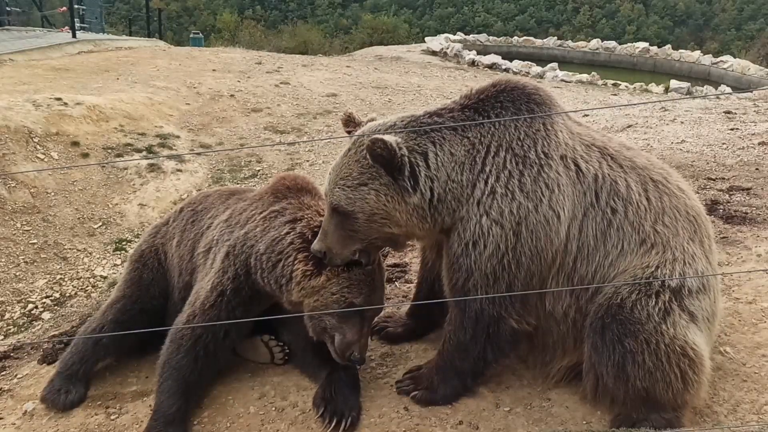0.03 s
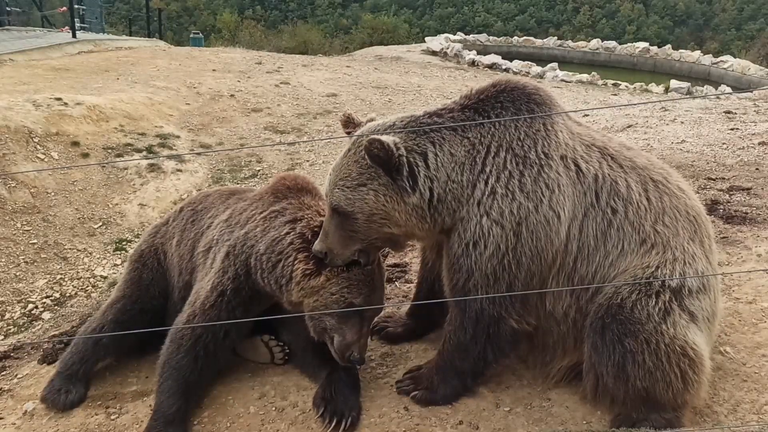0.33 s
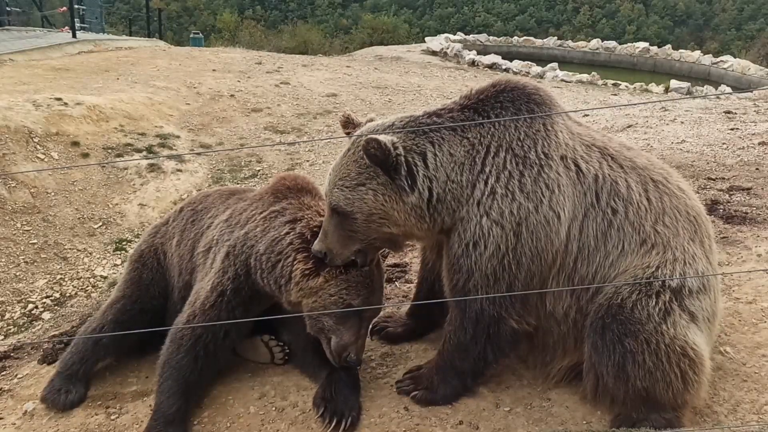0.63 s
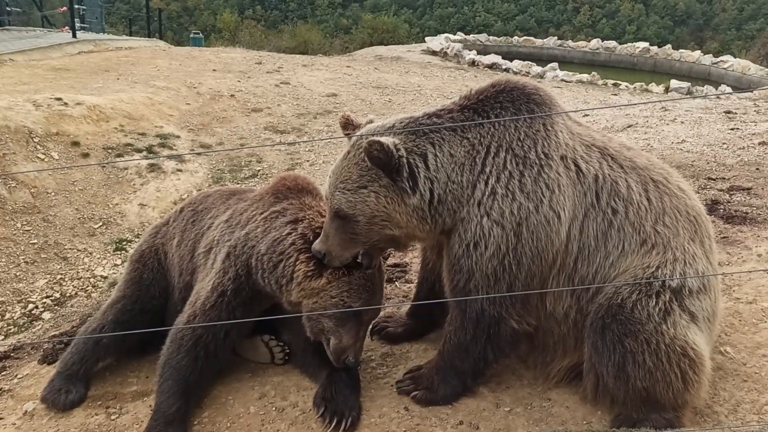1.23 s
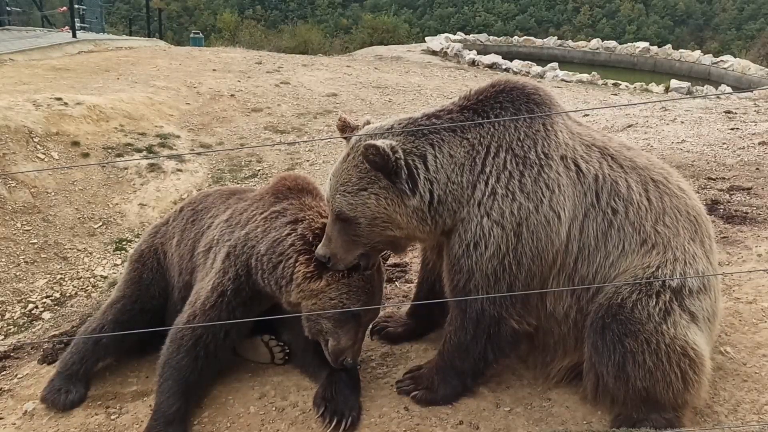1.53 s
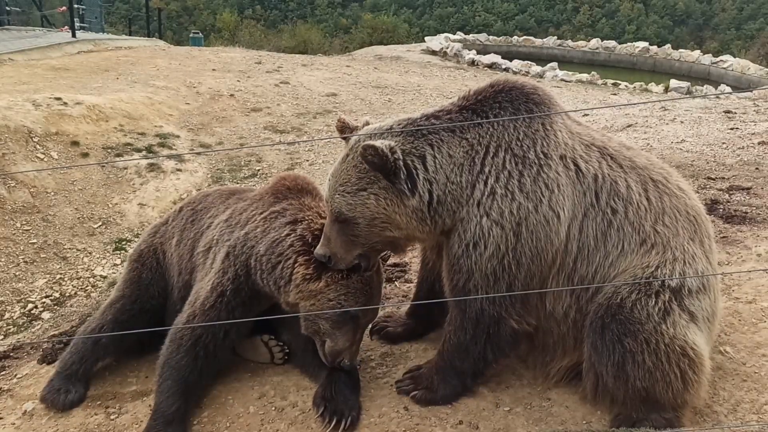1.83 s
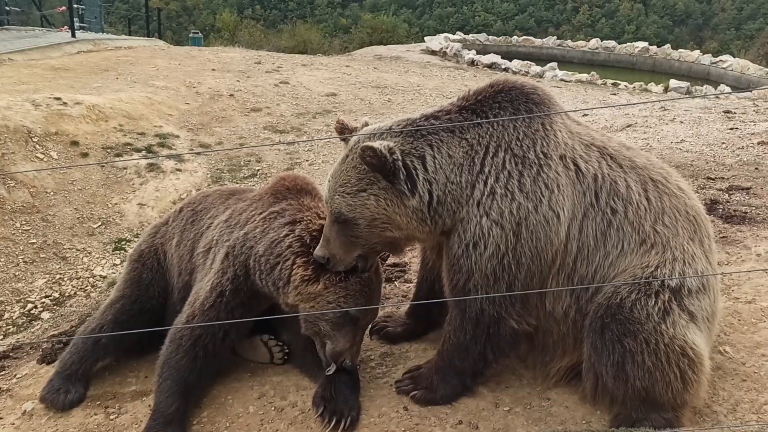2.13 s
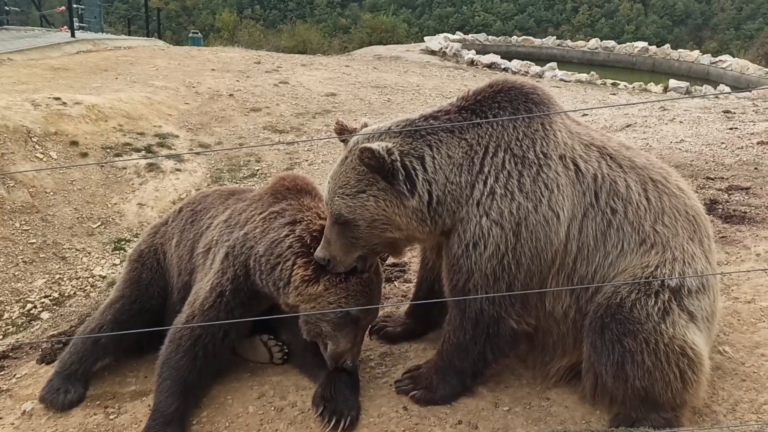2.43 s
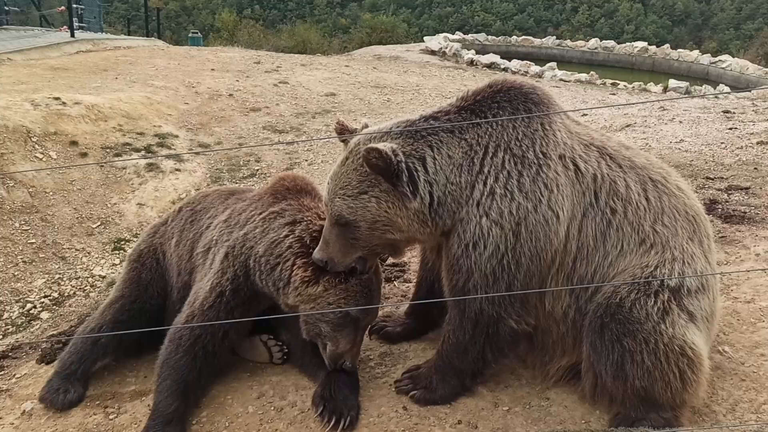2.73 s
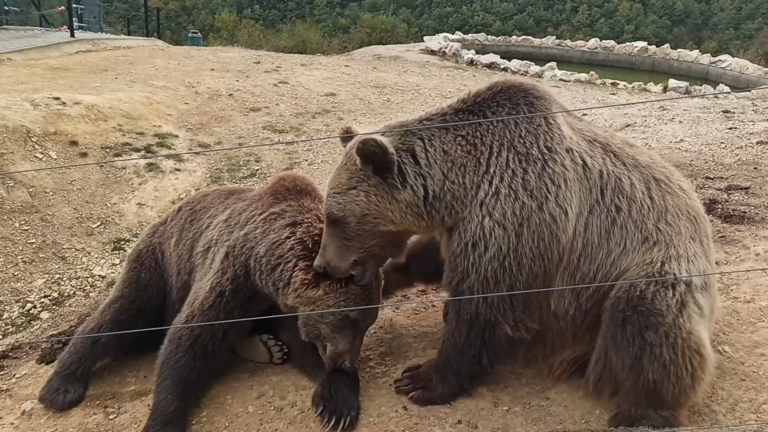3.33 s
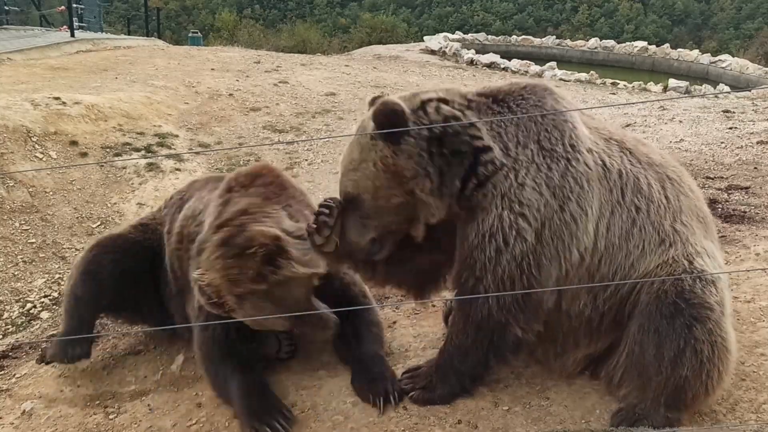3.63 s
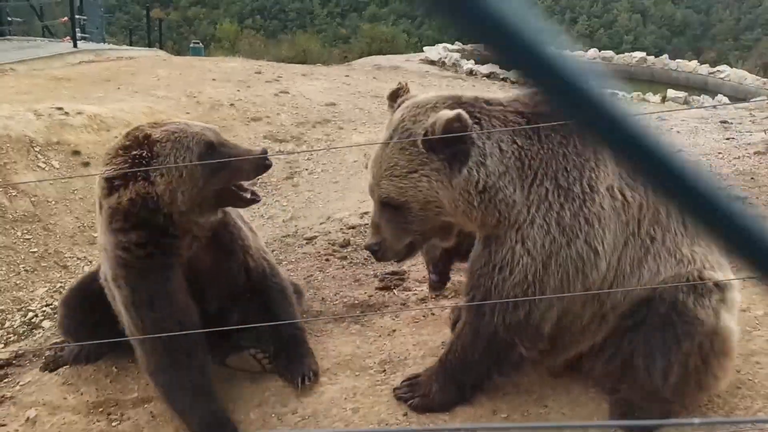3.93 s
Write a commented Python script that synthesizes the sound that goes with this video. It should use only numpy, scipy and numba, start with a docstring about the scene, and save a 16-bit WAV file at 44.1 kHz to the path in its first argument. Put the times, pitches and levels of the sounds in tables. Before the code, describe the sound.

A bear's low, pulsing purr runs steadily over a faint open-air hiss. It grows louder, and after a short scuffle of paws it gives way to a loud, breathy roar with one brief squeal in it.

```python
"""Bear purring, then roaring

A brown bear nuzzles another in an open enclosure and purrs in short throbbing bursts: slow slaps of
the vocal folds excite chest and throat. The purr swells, paws scuff the dirt, and a loud hoarse roar
breaks out, uneven pulses and breath filtered by the opening mouth. It cracks once into a squeal.
A faint outdoor hiss lies underneath."""
import sys
import numpy as np
from scipy import signal
from scipy.fft import rfft, irfft
from scipy.io import wavfile
from scipy.ndimage import uniform_filter1d
from numba import njit

SR = 44100
rng = np.random.default_rng(int(sys.argv[2]) if len(sys.argv) > 2 else 0)


def transcribe(u):
    """Save the signal u as a 16-bit wav file named by the first command-line argument.

    u: samples, shape (n,) or (channels, n), limited to [-1, 1]; the rate is SR.
    q: integer samples, one column per channel.
    """
    v = np.clip(np.atleast_2d(u).T, -1, 1)
    q = np.round(v * 32767).astype(np.int16)
    wavfile.write(sys.argv[1], SR, q)


N = 176400
T = np.arange(N) / SR


def from_db(db):
    """Amplitude ratio of a level in decibels."""
    return 10 ** (np.asarray(db) / 20)


def rms_one(x):
    """Normalisation to unit mean power."""
    return x / np.sqrt(np.mean(x ** 2) + 1e-20)


def even(x):
    """Division by the running RMS holds the power near one."""
    return x / np.sqrt(np.abs(uniform_filter1d(x * x, size=700)) + 1e-12)


def in_time(rows):
    """Linear interpolation in time, one curve per column after the first."""
    times, *columns = np.transpose(rows)
    return [np.interp(T, times, column) for column in columns]


def onset(rows):
    """A 5 ms ramp from silence, complete at the time of the first row."""
    return np.clip((T - rows[0][0]) * 200 + 1, 0, 1)


def at_hz(points, hz):
    """Interpolation on a logarithmic frequency axis."""
    freqs, values = np.transpose(points)
    return np.interp(np.log(hz + 1), np.log(freqs), values)


def colour(x, spectrum):
    """Minimum-phase filter: folding the cepstrum makes the given spectrum causal."""
    n = 2 * N
    cepstrum = irfft(np.log(from_db(at_hz(spectrum, np.arange(N + 1) * SR / n))))
    cepstrum[1:N] *= 2
    cepstrum[N + 1:] = 0
    return irfft(rfft(x, n) * np.exp(rfft(cepstrum)))[..., :N]


def drift(rate_hz):
    """Random modulation: low-passed noise of unit power."""
    lowpass = signal.butter(2, rate_hz, fs=SR, output="sos")
    return rms_one(signal.sosfilt(lowpass, rng.standard_normal(N)))


def stereo_noise(spectrum):
    """Partly coherent noise: the ears agree in the bass and less in the treble."""
    # interaural coherence: f/Hz, coherence (0-1)
    coherence = [(100,.99),(500,.97),(1000,.85),(2000,.5),(4500,.4),(8000,.55),(14000,.66)]
    alike = np.clip(at_hz(coherence, np.arange(N // 2 + 1) * SR / N), 0, 1)
    mid, side = rfft(rng.standard_normal((2, N)))
    ears = irfft(mid * np.sqrt(1 + alike) + side * np.sqrt(1 - alike) * [[1], [-1]])
    return rms_one(colour(ears, spectrum))


@njit
def resonate(x, hz, width_hz):
    """Two-pole resonator with a moving centre frequency."""
    y, r = np.zeros(len(x)), np.exp(-np.pi * width_hz / SR)
    for i in range(2, len(x)):
        drive = (1 - r * r) / 2 * (x[i] - x[i - 2])
        y[i] = drive + 2 * r * np.cos(2 * np.pi * hz[i] / SR) * y[i - 1] - r * r * y[i - 2]
    return y


def envelope(age, length, attack_s, release_s):
    """Linear rise, hold and exponential decay."""
    return np.clip(age / attack_s, 0, 1) * np.exp(-np.maximum(age - length, 0) / release_s)


def purr_bursts(bursts, hz, throat_db, rasp_db, attack_s):
    """Source and filter: fold slaps on a sagging pitch and breath ring the throat over a chest tone."""
    # response of the throat to the slaps, mouth shut: f/Hz, relative level/dB
    throat_response = [(90,-49),(135,12),(175,1),(270,-1),(365,-3.5),(440,-26.5),(500,-22),(570,-0.5),(680,-39.5),(900,-16),(1150,-27.5),(1290,-24.5),(1360,-11.5),(1450,-59),(2400,-39.5),(5000,-62)]
    # its response to breath noise: f/Hz, relative level/dB
    rasp_response = [(60,-33),(150,-19.5),(330,5.5),(450,-5),(570,15.5),(700,-4.5),(900,3.5),(1250,-11),(1350,7),(1480,-23),(2000,-12.5),(2550,-37),(3100,-12.5),(3500,-30),(4200,-31),(9000,-50)]
    sag_hz_per_s, jitter_s = 55, 0.00027
    chest_pull_hz = 5.8   # the chest rings a little above the folds' rate
    chest, slaps, airflow = np.zeros((3, N + SR))
    age = np.arange(SR // 5) / SR
    for start, length, db in bursts:
        span = slice(int(start * SR), int(start * SR) + len(age))
        cycles = (hz + rng.normal(0, 1.5)) * age - sag_hz_per_s * age ** 2 / 2
        # the chest tone sinks halfway through a long burst
        dip_db = (length > .08) * 6 * np.exp(-((age - length * 0.51) / 0.019) ** 2)
        tone = np.cos(2 * np.pi * (cycles + chest_pull_hz * (age - length / 2) - .12))
        chest[span] -= from_db(db - dip_db) * envelope(age, length - .004, attack_s, 0.015) * tone
        effort = from_db(db + throat_db) * envelope(age + 0.0074, length, 0.0092, 0.0096)
        closures = np.flatnonzero(np.diff(np.floor(cycles), prepend=-1))
        jitter, shimmer = rng.standard_normal((2, 32))[:, :len(closures)]
        slap_at = span.start + closures + (jitter * jitter_s * SR).astype(int)
        slaps[slap_at] += effort[closures] * from_db(2 * shimmer)
        airflow[span] += effort * (0.29 + 1.23 * np.exp(-(cycles % 1) / 0.17))
    ring = colour(slaps[:N], throat_response)
    ring *= np.sqrt(np.sum(slaps ** 2) / np.sum(ring ** 2) * SR / hz)
    rasp = colour(airflow[:N] * rng.standard_normal(N), rasp_response)
    rasp *= np.sqrt(np.sum(airflow ** 2) / np.sum(rasp ** 2))
    return from_db(-21.5) * chest[:N] - from_db(-32) * ring + from_db(rasp_db) * rasp


def purr():
    """Intermittent phonation: a run of soft bursts, then two forced ones, higher and louder."""
    # soft bursts: t/s, duration/s, relative level/dB
    bursts = [(0,.014,2),(.045,0.097,2),(.187,0.087,3.5),(.335,0.099,1),(.463,0.046,-0.5),(.527,0.057,1.5),(.603,0.043,-1),(.68,0.048,2.5),(.743,0.039,0),
              (.833,0.09,2.5),(.974,0.1,1.5),(1.113,0.026,-1),(1.182,0.1,1.5),(1.338,0.088,2),(1.474,0.098,1.5),(1.617,0.031,-1),(1.675,0.051,0.5),
              (1.748,.041,-0.5),(1.834,0.097,0.5),(1.98,0.1,0.5),(2.117,0.032,-1),(2.187,0.046,0.5),(2.251,0.036,-1),(2.347,0.0816,1.5),(2.486,.099,-0.5),
              (2.622,0.033,-1.5),(2.702,0.027,1),(2.76,0.037,0),(2.847,0.027,0.5),(2.903,.047,-0.5),(2.995,0.047,1.5),(3.058,0.049,1),(3.123,0.043,-1),(3.203,0.057,1.5)]
    # forced bursts: t/s, duration/s, relative level/dB
    swells = [(3.262,0.054,8.5),(3.323,0.052,9.5)]
    soft = purr_bursts(bursts, hz=91.84, throat_db=-1.96, rasp_db=-38, attack_s=0.017)
    forced = purr_bursts(swells, hz=100.2, throat_db=-2.5, rasp_db=-34, attack_s=0.014)
    return signal.sosfilt(signal.butter(3, 75, "high", fs=SR, output="sos"), soft + forced)


def outdoor_air():
    """Ambient noise: a faint, stationary broadband hiss."""
    # faint outdoor hiss, with a 9-11 kHz band filtered out: f/Hz, relative level/dB
    spectrum = [(25,-12),(60,-10),(150,15.5),(500,6.5),(900,4),(1500,-1.5),(2500,-9),(3100,-7),(4400,-7),(5300,-15.5),(5900,-15.5),(6500,-7.5),(7500,-6.5),(8400,-15.5),(8900,-24),(11300,-24),(11800,-14),(13500,-10),(15500,-12)]
    return from_db(-46) * stereo_noise(spectrum)


def scuffs():
    """Friction noise: paws, fur and muzzle rub in short band-limited puffs."""
    # rubbing contacts: t/s, duration/s, level/dB, band frequency f/Hz
    contacts = [(0.094,.005,-59,7200),(2.423,0.026,-54.5,4600),(2.867,0.0065,-43,3900),(3.35,0.035,-48,2210),(3.383,.005,-30,936),(3.459,0.022,-36,1330),(3.49,0.028,-35.5,940)]
    puffs = np.zeros(N)
    for start, length, db, hz in contacts:
        band = signal.butter(2, [hz * 0.65, hz * 1.17], "band", fs=SR, output="sos")
        grit = rms_one(signal.sosfilt(band, rng.standard_normal(N)))
        puffs += from_db(db) * grit * envelope(T - start, length, attack_s=0.0023, release_s=0.0041)
    return puffs


def roar():
    """Formant filtering of uneven pulses and breath over chest tone and rumble; gives sound, airflow."""
    # phonation: t/s, pitch f/Hz, chest tone level/dB, roughness (0-1)
    phonation = [(3.49,114.9,-32,0.45),(3.525,117.7,-33.5,0.46),(3.546,118.7,-14.5,0.3),(3.575,127,-15.5,.15),(3.605,131.9,-14,0.19),(3.645,136.1,-14.5,0.35),(3.68,133.6,-16,0.4),(3.715,129.6,-19,0.24),(3.74,121,-9.5,.35),(3.765,128,-20.5,.45),
                 (3.793,146.7,-14.5,.2),(3.822,138.4,-29,0.35),(3.845,126.9,-15,0.37),(3.875,115.2,-17,0.41),(3.92,112.2,-14.5,0.48),(3.96,116,-16,0.55),(4.0,123.6,-13,.7)]
    # first formant as the mouth opens: t/s, f/Hz, level/dB
    mouth = [(3.49,300,-58),(3.515,305,-30),(3.532,320,-12),(3.55,350,-15),(3.565,352,-10),(3.6,382,-11.5),(3.654,372,-10),(3.684,366,-20.5),(3.712,447,-14.5),
             (3.73,515,-27),(3.743,473.4,-11),(3.774,472,-17.5),(3.82,517,-21),(3.85,520,-12.5),(3.89,560,-13),(3.95,537.8,-13.5),(4.0,489.8,-11.5)]
    # upper formants: t/s, second f/Hz, level/dB, third f/Hz, level/dB
    upper_formants = [(3.48,950,-69,1400,-51),(3.51,920,-34,1400,-54),(3.535,795,-48,1500,-48),(3.56,790,-36,1600,-29.5),(3.61,770,-33,1440,-29.5),(3.655,860,-37,1574,-20.5),(3.7,840,-14.5,1570,-27),
                      (3.73,775,-38,1320,-32.5),(3.745,860,-15.5,1240,-22),(3.77,800,-25.5,1420,-33.5),(3.805,720,-19.5,1510,-21.5),(3.85,780,-25.5,1240,-24),(3.89,890.6,-21,1250,-26.5),(3.94,880,-16,1230,-21.5),(4.0,878.6,-20.5,1240,-20.5)]
    # rumble between the lowest harmonics: f/Hz, relative level/dB
    rumble_spectrum = [(25,-23),(55,-24),(110,-7.5),(170,-8.5),(220,-4),(320,-1.5),(460,-3.5),(800,-21.5),(3000,-78)]
    hz, chest_db, rough = in_time(phonation)
    first_hz, first_db = in_time(mouth)
    second_hz, second_db, third_hz, third_db = in_time(upper_formants)
    jitter, shimmer_db, scatter_s = .025, 9.5, 0.0064   # jitter and shimmer at full roughness
    cycles = np.cumsum(hz * (1 + jitter * rough * drift(70))) / SR
    closures = np.diff(np.floor(cycles), prepend=0)
    pulses = rms_one(closures * from_db(shimmer_db * rough * drift(72)))
    age = T[:SR // 30]
    smear = rng.standard_normal(len(age)) * np.exp(-age / scatter_s)
    scattered = rms_one(signal.fftconvolve(pulses, smear)[:N])
    airflow = rms_one(2.4 + np.exp(-(cycles % 1) / 1.2))

    def formant(folds, centre_hz, db, width_hz, breath):
        """Two resonators in cascade; roughness trades fold pulses for breath noise."""
        source = (1 - rough) * folds + breath * rough * airflow * rng.standard_normal(N)
        ring = resonate(source, centre_hz, width_hz)
        return from_db(db) * even(resonate(ring, centre_hz, width_hz * 2.24))

    voice = (formant(pulses, first_hz, first_db, width_hz=116.0, breath=1.0)
             - formant(pulses, second_hz, second_db, width_hz=273.0, breath=1.56)
             + formant(scattered, third_hz, third_db, width_hz=317.0, breath=.45)
             + formant(scattered, np.full(N, 2020.0), third_db - 14, width_hz=400.0, breath=.5))
    chest = from_db(chest_db) * np.sqrt(2) * np.sin(2 * np.pi * cycles)
    rumble = from_db(first_db - 6) * even(colour(airflow * rng.standard_normal(N), rumble_spectrum))
    return onset(phonation) * (voice + chest + rumble), airflow


def breath_hiss(airflow):
    """Amplitude modulation: breath noise pulses with the airflow and flickers at random."""
    # course of the hiss, from the swell through the roar: t/s, level/dB
    course = [(3.24,-66),(3.28,-39.5),(3.32,-49),(3.37,-44),(3.42,-50.5),(3.46,-47),(3.49,-38.5),(3.535,-31),(3.56,-33),(3.61,-33.5),(3.66,-33),(3.73,-35),(3.8,-29.5),(3.87,-32),(3.91,-33),(3.95,-29.5),(4.0,-26.5)]
    # breath hiss, with a 9-11 kHz band filtered out: f/Hz, relative level/dB
    spectrum = [(900,-5),(1600,6.5),(2100,-1),(2800,-4),(3800,6.5),(4600,5),(5000,-4),(5800,-11),(6500,2),(7400,5),(8400,0),(8900,-47),(11300,-53),(11900,-8),(15500,-12)]
    grit = airflow * rms_one(from_db(2.5 * drift(150)))
    hiss = onset(course) * from_db(in_time(course)[0]) * grit * stereo_noise(spectrum)
    return hiss * from_db([[0.95], [-0.95]])   # slightly to the left


def squeal(start, length, from_hz, to_hz, db):
    """Register break: the voice cracks into one falling, nearly pure tone."""
    age = np.maximum(T - start, 0)
    hz = to_hz + (from_hz - to_hz) * np.exp(-age / .011)
    phase = 2 * np.pi * np.cumsum(hz) / SR
    tone = np.sin(phase) + 0.045 * np.sin(2 * phase)
    return from_db(db) * envelope(age, length, attack_s=0.005, release_s=0.0058) * tone


def enclosure(x):
    """Scattering by ground and fence: early reflections widen the treble, a faint tail follows."""
    # how much the reflections differ between the ears: f/Hz, relative level/dB
    side_spectrum = [(110,-27.5),(220,-18.5),(350,-13.5),(550,-15.5),(800,-13.5),(1400,-8.5),(2500,-3)]
    t60_s, right_delay_s = 0.47, .00003
    age = T[:SR // 3]
    tail = rng.standard_normal(len(age)) * from_db(-60 * age / t60_s) * (age > .012)
    early = rng.standard_normal(len(age)) * np.exp(-age / 0.044) * (age > .003)
    reverb, side = [signal.fftconvolve(x, h / np.sqrt(np.sum(h * h)))[:N] for h in (tail, early)]
    side = colour(side, side_spectrum)
    left, right = x + from_db(-15) * reverb + from_db(1) * side * [[1], [-1]]
    return np.array([left, np.interp(T - right_delay_s, T, right)])


def scene():
    """Superposition of the bears, their reflections and the open air."""
    roaring, airflow = roar()
    hiss = breath_hiss(airflow)
    bears = purr() + scuffs() + roaring
    bears += squeal(start=3.689, length=0.032, from_hz=900, to_hz=779, db=-9.5)
    return enclosure(bears) + hiss + outdoor_air()


def record(dry):
    """Soft saturation rounds the highest peaks; a steep low-pass cuts the top."""
    rounded = dry / (1 + dry ** 8) ** (1 / 8)
    return signal.sosfilt(signal.ellip(10, .2, 80, 15500, fs=SR, output="sos"), rounded)


dry = scene()
out = record(dry)
transcribe(out)
```